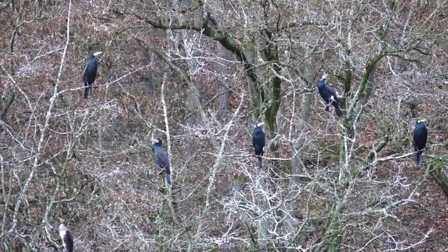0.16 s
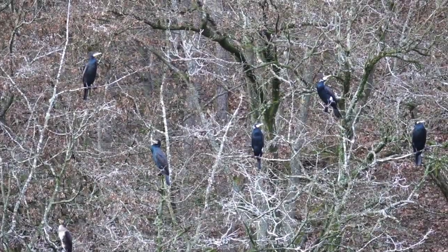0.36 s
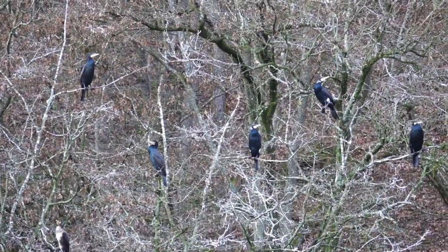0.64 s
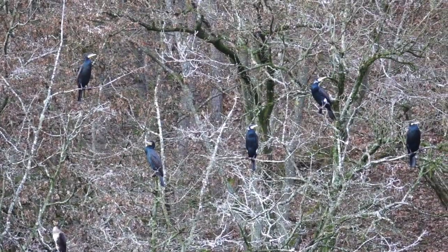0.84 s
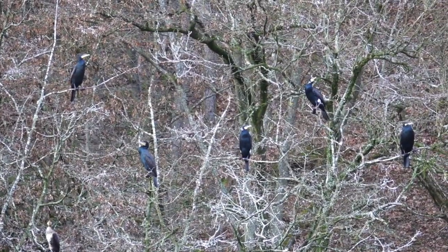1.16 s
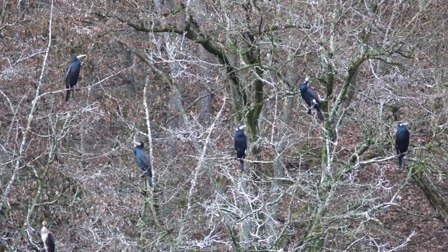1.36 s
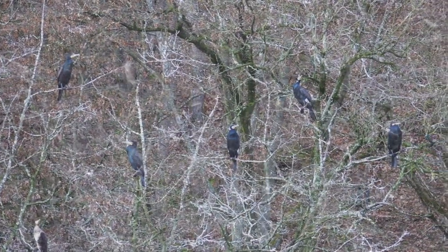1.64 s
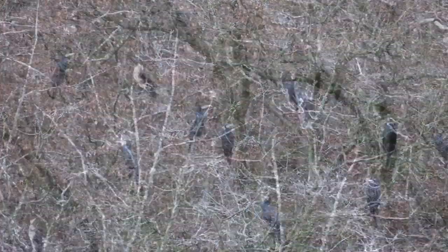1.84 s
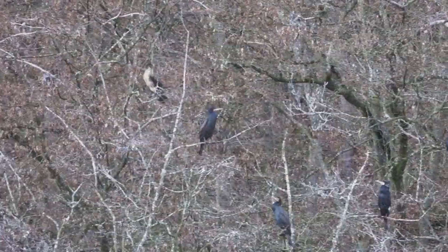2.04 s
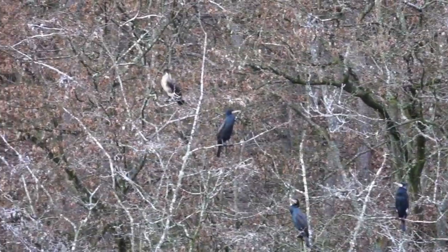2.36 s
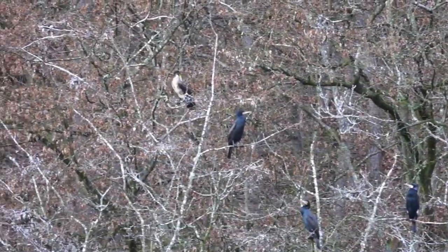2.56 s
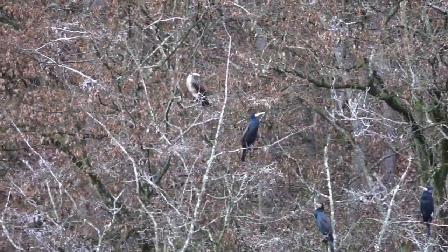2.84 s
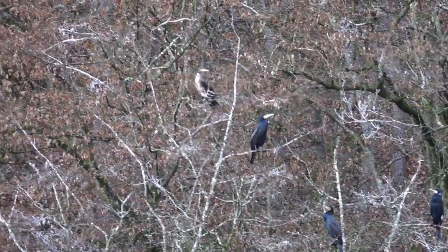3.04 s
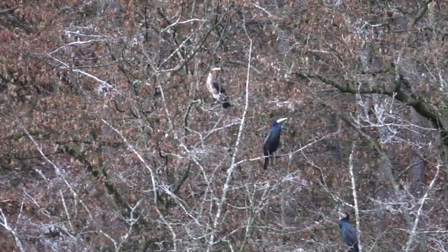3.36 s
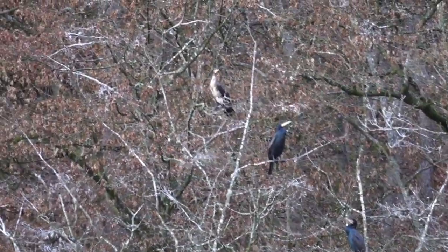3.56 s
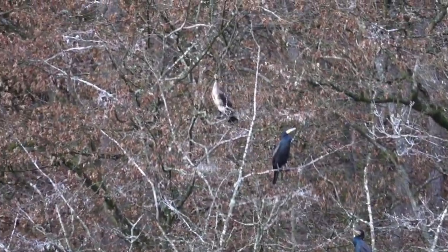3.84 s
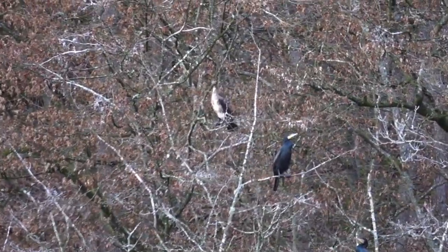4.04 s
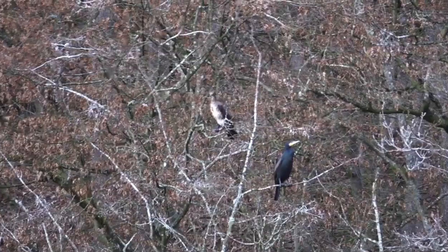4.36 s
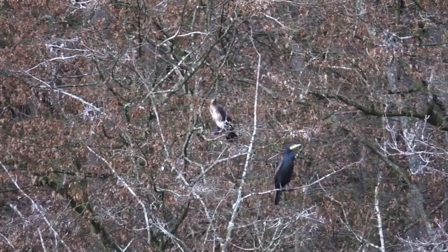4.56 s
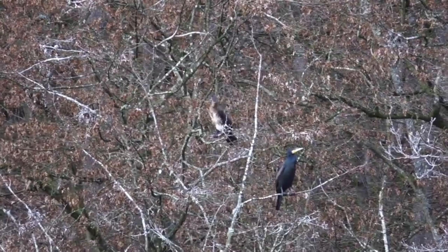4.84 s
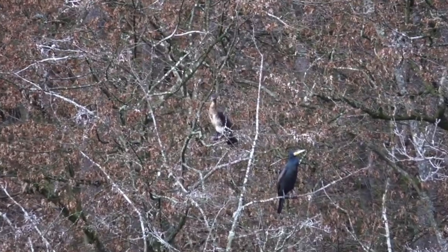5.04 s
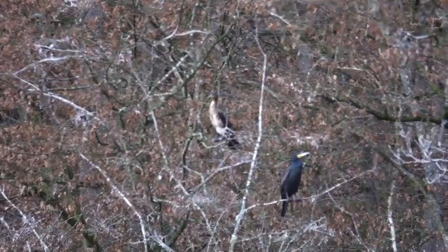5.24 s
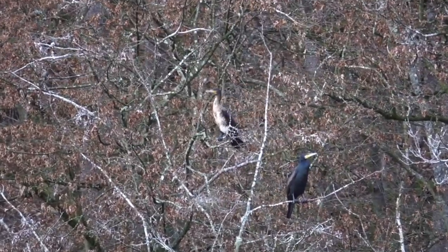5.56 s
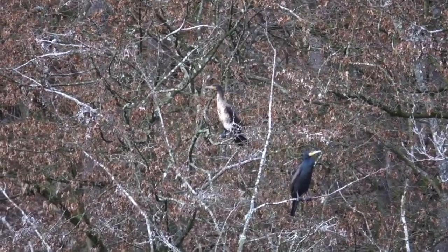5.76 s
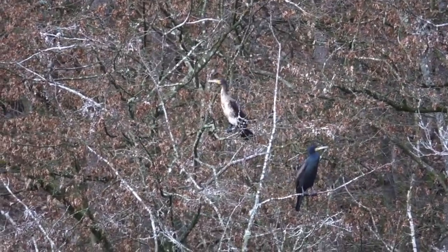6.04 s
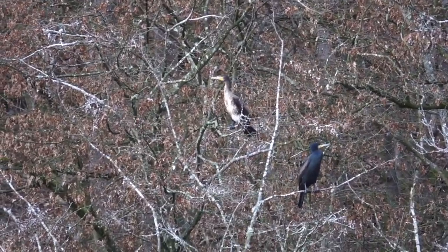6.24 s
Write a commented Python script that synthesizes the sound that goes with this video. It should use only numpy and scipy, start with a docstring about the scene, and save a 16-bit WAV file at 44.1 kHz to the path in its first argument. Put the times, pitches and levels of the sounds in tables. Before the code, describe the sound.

Large dark waterbirds quarrel on bare branches. First come faint, whispery wing flaps over still woodland air, then dry bill clacks, breathy hisses and a swell of rustling and distant twitter. Short, rough, nasal squawks come in rapid series, loudest in the middle, then give way to slow, throaty, rattling croaks. The microphone is outdoors, with low wind-like bumps, central birds and only a slight, thin woodland echo.

```python
"""Cormorant quarrel at a woodland roost

A bird flaps in among rustling twigs; a quarrel follows. Squawks break from a squeak into a rasp (slapping
membrane through throat resonances), with low croaks among them (slow pulses ringing a swollen throat).
Bills clack and hiss (ringing noise), wing gusts thump the microphone (short sine eddies),
far birds twitter (sliding tones), and the trees return a faint echo (decaying noise convolution)."""
import sys
import numpy as np
from scipy import signal
from scipy.fft import rfft, irfft
from scipy.io import wavfile
from scipy.ndimage import uniform_filter1d, map_coordinates

SR = 44100
rng = np.random.default_rng(int(sys.argv[2]) if len(sys.argv) > 2 else 0)


def unload_wav(signal):
    """Save mono or channel-first audio to the path in sys.argv[1] as 16-bit WAV at rate SR, clipped to [-1, 1]."""
    wavfile.write(
        sys.argv[1],
        SR,
        np.round(np.clip(np.atleast_2d(signal).T, -1, 1) * 32767).astype(np.int16),
    )


N = 282319
T = np.arange(N) / SR
FILTER_SIZE = 16384
FREQS = np.maximum(np.arange(FILTER_SIZE // 2 + 1) * SR / FILTER_SIZE, 1)  # Hz

# Squawks: (time [s], length [s], squeak pitch [Hz], break time constant [s], level [dB], growth over call [dB],
# mid-call arch [dB], roughness [factor], end drop [dB], rasp trail decay [s], highest overtone [Hz])
SQUAWKS = [(3.37, 0.029, 1038, 0.061, -36, -0.5, 1.5, 2.6, -4, 0.017, 8700),
           (3.538, 0.057, 1253, 0.022, -37.5, -4.5, -9, 0.79, -9.5, 0.018, 9100),
           (3.717, 0.019, 1870, 0.038, -43.5, 17.5, 1.5, 0, -6, 0.002, 8700),
           (4.135, 0.046, 1288, 0.021, -37, 9, 3.5, 1.17, -7.5, 0.027, 9300),
           (4.292, 0.081, 1178, 0.013, -33, 0, -3, 0.85, -15, 0.026, 12900),
           (4.504, 0.096, 1297, 0.017, -34, 6, 5, 1.04, 0.5, 0.021, 12900),
           (4.681, 0.074, 1730, 0.017, -33, 4.5, 1, 0.8, 1.5, 0.021, 13000),
           (4.873, 0.069, 1930, 0.016, -38, 14.5, 2, 0.88, -14, .007, 12900),
           (5.08, 0.056, 836, 0.0089, -33.5, 6, 4.5, 1, 0, 0.019, 13000),
           (5.261, 0.055, 776, 0.02, -47, 0, 0, 0.8, -10, 0.011, 5800),
           (5.323, 0.021, 1216, 0.056, -40.5, 2.5, -4, 0.07, -13, 0.0039, 4200),
           (5.987, 0.095, 753, 0.0064, -60, -4, -5, 1.28, -14, 0.0043, 4460)]
# Throat and bill resonances of the squawk, before per-call detuning: (frequency [Hz], width [Hz], level [dB])
THROAT = [(669, 160, -14.5), (1380, 320, -18), (1986, 220, -2), (2325, 80, 10), (2841, 113, 1.5),
          (3658, 153, 5.5), (4356, 236, -1.5), (4940, 300, -1.5), (5700, 290, -4), (6334, 110, -9),
          (7720, 320, -9.5), (8180, 290, -15.5), (9150, 240, -17.5), (11300, 600, -21.5),
          (11960, 240, -18.5)]
# Thin squeaks: (time [s], length [s], first pitch [Hz], last pitch [Hz], level [dB])
SQUEAKS = [(3.371, 0.0037, 2520, 2440, -38), (4.673, 0.027, 5090, 4750, -40),
           (4.878, .014, 5220, 4800, -46)]
# Clear fundamentals: (time [s], length before ring-out [s], mean pitch [Hz], level [dB])
HOOTS = [(4.606, 0.032, 632, -54.5), (4.712, 0.042, 689, -38), (5.146, 0.033, 692, -41)]
# Croaks: (time [s], length [s], slack pulse rate [Hz], lowest resonance [Hz], its glide over the call [Hz],
# level [dB], rise [s], pressed second resonance [dB], press centre [share of length],
# press width [share of length], third resonance re second [dB], pressed sag of lowest [Hz], unevenness [factor])
CROAKS = [(4.849, 0.11, 144, 440, 48, -40, 0.025, -5.5, 0.75, 0.23, -5.5, 9, 0.87),
          (5.205, 0.13, 139.2, 510, -47, -37.5, 0.04, -5.5, 0.73, 0.23, -6.5, 126, 2),
          (5.527, .12, 125.1, 468.4, -7.5, -32.5, 0.048, -13.5, 0.7, .24, -17, 49, 1.1),
          (5.827, 0.1153, 132.8, 465.4, 4.5, -33.5, 0.02, -6.5, .62, .4, -13, 5.6, 0.76),
          (6.131, 0.11, 137.4, 512, -14, -37, 0.011, -15.5, 0.74, .34, 0, 8.2, 0.96)]
# Swollen-throat resonances: (multiple of lowest [ratio], decay [s])
POUCH = [(0.999, 0.0013), (1.96, 0.001128), (2.9, 0.00093), (4.8, 0.00032)]
# Bill clacks: (time [s], relative level [dB], upper rings re lower [dB before scaling])
CLACKS = [(2.6095, -32, -19), (2.931, -41, -4.5), (6.094, -32, 2.5)]
# Lower bill rings: (frequency [Hz], width [Hz], level [dB])
BILL_LOW = [(1208, 95, 7), (1703, 155, -1), (2530, 400, -17)]
# Upper bill rings: (frequency [Hz], width [Hz], level [dB])
BILL_TOP = [(2780, 1520, -6), (3680, 170, 8), (4600, 1040, -11.5)]
# Wing strokes: (time [s], relative swish [dB], puff [dB], decay [s], relative crack [dB])
STROKES = [(0.222, -54, -73, 0.016, -57), (0.421, -57.5, -61.5, 0.021, -74),
           (0.627, -49.5, -58, 0.016, -44.5), (0.826, -44.5, -58, 0.022, -60),
           (1.019, -51.5, -59, 0.028, -39.5), (1.215, -48.5, -50.5, 0.0089, -46.5),
           (1.414, -53.5, -53, 0.012, -82), (1.614, -47, -57, 0.023, -66), (1.816, -61, -54, 0.0079, -48)]
# Feather swish spectrum: (frequency [Hz], relative level [dB])
FEATHER = [(400, -36), (900, 4), (1500, -14.5), (2400, 3), (3500, 13.5), (4500, -6.5), (6200, -20),
           (13000, -57)]
# Air puff spectrum: (frequency [Hz], relative level [dB])
PUFF = [(30, -46), (150, -3.5), (290, 11.5), (500, -2), (1000, -4.5), (2500, -33)]
# Wings brushing twigs: (time [s], relative rustle [dB], decay [s], relative tick [dB])
BRUSHES = [(3.192, -38.5, 0.027, -53), (5.31, -33.5, 0.025, -43.5)]
# Brushed twig spectrum: (frequency [Hz], relative level [dB])
TWIGS = [(900, -33.5), (2100, -4), (3900, 3), (5500, -9.5), (8500, -17.5), (12500, -28), (15000, -40)]
# Open-bill hisses: (time [s], length [s], first ring [Hz], last ring [Hz], level [dB])
HISSES = [(0.704, 0.078, 3300, 3620, -71.5), (0.92, 0.038, 3340, 3480, -66),
          (2.731, 0.083, 3500, 3130, -62.5), (2.738, 0.077, 2304, 2370, -61.5),
          (2.97, 0.037, 3300, 3580, -50.5), (2.996, 0.23, 3410, 3016, -61.5)]
# Rings of the long wash: (frequency [Hz], width [Hz], level [dB])
WASH = [(2850, 100, -6.5), (3620, 210, 0)]
# Gusts on the microphone: (time [s], length [s], nominal rocking rate [Hz], level [dB])
GUSTS = [(2.916, 0.041, 169.4, -48.5), (3.22, 0.022, 105, -42), (3.334, 0.047, 154.3, -37),
         (3.683, 0.013, 171, -43), (3.8, 0.0126, 150, -42), (5.321, 0.025, 146.7, -35.5),
         (5.352, 0.017, 72, -37)]
# Background stir: (time [s], churned air before AIR_OFFSET_DB [dB], twigs and twitter before TWIG_OFFSET_DB [dB])
STIR = [(0.0, -73, -77), (0.86, -86, -76.5), (1.21, -78, -79.5), (1.69, -80, -83.5), (2.64, -66, -71.5),
        (3.17, -54, -64.5), (3.53, -56, -62.5), (3.85, -57, -62.5), (4.47, -68.5, -71), (4.71, -61, -70),
        (5.11, -62.5, -79), (6.4, -71, -91.5)]
# Churned air spectrum: (frequency [Hz], relative level [dB])
AIR = [(15, -30), (25, -9.5), (151, 2), (243, 1.5), (450, -8), (630, -14.5), (730, -10.5), (909, -28),
       (2000, -26.5), (2600, -55.5), (4400, -120)]
# Rustling twig spectrum: (frequency [Hz], relative level [dB])
RUSTLE = [(820, -29), (1400, -11), (2090, -9), (2270, -3), (2550, -14), (2820, -6), (3640, -3.5),
          (4770, -15), (5500, -18.5), (8000, -34), (10400, -84)]
# Still air of the wood, spectrum: (frequency [Hz], relative level [dB])
WOOD = [(18, -39.5), (30, -21.5), (301, 2), (503, -8), (757, -5.5), (1230, -7.5), (1590, -20),
        (3430, -27.5), (6030, -22.5), (13700, -25.5)]

SQUEAK_ROUGH = .14  # share of the roughness present before the break
SQUAWK_ATTACK_S, SQUAWK_RELEASE_S = 0.0092, 0.0021
DOUBLING = 0.71  # strong-weak alternation of rough slaps
THROAT_SAG = 0.02  # time-warp factor that lowers the resonances through a call
RASP_HZ, RASP_SAG_HZ_PER_S, RASP_LOWEST_HZ = 815.3, 2200, 573  # pitch after the break
# a weak push rattles: mean rate, onset level, further drop to full rattle
RATTLE_HZ, RATTLE_BELOW_DB, RATTLE_FULL_DB = 111.9, -36, 8.5
CROAK_ONSET_DB, CROAK_FADE_DB_PER_S, CROAK_RELEASE_S = -13, -40.5, 0.0092
PRESS_RATE, PRESS_DIP_DB = .33, -4.5  # pressing: pulse speed-up share, dip of lowest resonance
WAKE_HZ, WAKE_DB, WAKE_STRETCH = 41.7, -5.5, 3.34  # nominal rate, maximum re eddy, length re eddy
AIR_OFFSET_DB, TWIG_OFFSET_DB, WOOD_DB = 3, -1.5, -72.5
TOP_HZ = 15200


def undb(db):
    """Decibels to gain."""
    return 10 ** (np.asarray(db) / 20)


def unit(x):
    """Scale to rms 1."""
    return x / np.sqrt(np.mean(x ** 2) + 1e-20)


def shape(x, gain):
    """Minimum-phase filter with the given gain at FREQS, via the folded cepstrum."""
    cepstrum = irfft(np.log(gain + 1e-6))
    cepstrum[1:FILTER_SIZE // 2] *= 2
    cepstrum[FILTER_SIZE // 2:] = 0
    response = irfft(np.exp(rfft(cepstrum)))[:4096]
    return signal.oaconvolve(x, response)[:len(x)]


def slope(points):
    """Gain through (Hz, dB) points, on a log-frequency axis."""
    hz, db = np.transpose(points)
    return undb(np.interp(np.log(FREQS), np.log(hz), db))


def rings(modes):
    """Gain of steep resonances (Hz, width Hz, dB), added in power."""
    power = sum((undb(db) / (1 + 2 * ((FREQS - hz) / width) ** 2)) ** 2 for hz, width, db in modes)
    return np.sqrt(power)


def noise(gain):
    """Coloured noise of rms 1."""
    return unit(shape(rng.standard_normal(N), gain))


def walk(rate_hz, size=N):
    """Smooth random curve through normal draws, rate_hz of them a second."""
    steps = np.arange(size) * rate_hz / SR
    return map_coordinates(rng.standard_normal(int(steps[-1]) + 3), [steps], order=2, mode="nearest")


def burst(start_s, rise_s, decay_s):
    """Envelope with a linear rise and an exponential decay."""
    age = np.maximum(T - start_s, 0)
    return np.minimum(age / rise_s, 1) * np.exp(-np.clip((age - rise_s) / decay_s, 0, 20))


def swell(start_s, length_s):
    """Half-sine envelope."""
    return np.sin(np.pi * np.clip((T - start_s) / length_s, 0, 1))


def call(start_s, length_s, tail_s):
    """Sample indices of a call and its tail, their age [s], and the share of the call gone by."""
    span = np.arange(int(start_s * SR), min(int((start_s + length_s + tail_s) * SR), N))
    age = (span - span[0]) / SR
    return span, age, np.minimum(age / length_s, 1)


def glide_phase(first_hz, last_hz, gone):
    """Phase of a linear pitch glide."""
    return 2 * np.pi * np.cumsum(first_hz + (last_hz - first_hz) * gone) / SR


def highpass(x, order, hz):
    """Zero-phase high-pass."""
    return signal.sosfiltfilt(signal.butter(order, hz, "high", fs=SR, output="sos"), x)


def sung(voice, loudness, size=500):
    """Level a sound to the given loudness, whichever resonance its harmonics cross."""
    power = np.maximum(uniform_filter1d(voice ** 2, size), 0)
    return voice * loudness / np.sqrt(power + 1e-4 * power.max())


def squawks(jitter=0.0868, shimmer_db=-0.5, shimmer_rate_hz=420, bright_power=2.0, gape_db=5, shut_db=-5):
    """A membrane slaps shut once a cycle; when rough, its periods scatter and air rasps through."""
    rasp, jitter_rate_hz, flex_s, flex_rate_hz = .3, 750, .00021, 55
    smear, detune, recolour_db, rattle_depth = .11, .008, .8, .8
    voice, loudness, sag_s, bill_db = np.zeros((4, N))
    k = np.arange(1, 24)[:, None]  # harmonic numbers
    for (start, length, squeak_hz, break_s, db, growth_db, arch_db,
         roughness, drop_db, trail_s, highest_hz) in SQUAWKS:
        span, age, gone = call(start, length, 2 * (trail_s + SQUAWK_RELEASE_S))
        size = len(span)
        # the squeak holds briefly, then breaks down into the rasp
        squeak = np.exp(-(age / break_s) ** 2)
        rasp_hz = np.maximum(RASP_HZ - RASP_SAG_HZ_PER_S * age, RASP_LOWEST_HZ)
        hz = squeak * squeak_hz + (1 - squeak) * rasp_hz
        smooth = squeak * (1 - SQUEAK_ROUGH) * (age < length)
        rough = np.minimum(roughness * (1 - smooth), 1.3)
        rough = rough * np.exp(.25 * walk(80, size) + .06)

        # some calls drop sharply to a weaker rasp, others fade gradually from full level
        after = np.maximum(age - length, 0)
        trail = undb(min(drop_db, 0)) * np.exp(-after / trail_s)
        gate = np.minimum(age / SQUAWK_ATTACK_S, 1) ** 2
        gate *= np.maximum(np.exp(-after / SQUAWK_RELEASE_S), trail)
        gate *= np.minimum((age[-1] - age) / (2 * SQUAWK_RELEASE_S), 1)
        push_db = db + growth_db * (gone - .5) + arch_db * (np.sin(np.pi * gone) - 2 / np.pi)

        hz = hz * np.exp(jitter * rough * walk(jitter_rate_hz, size))
        phase = 2 * np.pi * np.cumsum(hz) / SR
        harmonics = np.cos(k * phase + smear * k ** 2) * (k * hz < highest_hz)
        slaps = unit(harmonics.sum(axis=0) * (1 + DOUBLING * rough * np.cos(phase / 2)))
        air = rasp * rough * (1 + np.cos(phase)) * rng.standard_normal(size)
        source = gate * (slaps + air) * undb(shimmer_db * rough * walk(shimmer_rate_hz, size))

        # the throat is held a little differently for every call
        holds = rng.standard_normal((len(THROAT), 2))
        held = [(f * (1 + detune * a), width, ring_db + recolour_db * b)
                for (f, width, ring_db), (a, b) in zip(THROAT, holds)]
        voice[span] += shape(source, rings(held))

        below_db = RATTLE_BELOW_DB - push_db - 20 * np.log10(gate + 1e-6)
        weak = np.clip(below_db / RATTLE_FULL_DB, 0, 1) * (1 - squeak)
        rattle_hz = RATTLE_HZ * np.exp(.42 * walk(RATTLE_HZ, size))
        rattle = np.cos(2 * np.pi * np.cumsum(rattle_hz) / SR)
        loudness[span] += gate * undb(push_db) * (1 + rattle_depth * weak * rattle)
        # the bill opens through the call and shuts as it trails off
        bill_db[span] = gape_db * (np.sin(.7 * np.pi * gone) - .75) + shut_db * np.minimum(after / trail_s, 1)
        sag_s[span] += THROAT_SAG * length * gone * (1 - gone)

    top = highpass(voice, 6, 6800)
    # the soft throat bends the lower resonances; those of the stiff bill stay put
    bent = T + sag_s + flex_s * walk(flex_rate_hz)
    throat = map_coordinates(voice - top, [bent * SR], order=3)
    upper = highpass(throat, 4, 3200)
    # harder calls close more sharply and carry more top
    effort = (loudness / undb(-34.5)) ** bright_power
    return sung(throat - upper + undb(bill_db) * (upper + effort * top), loudness, size=350)


def squeaks():
    """The tight membrane gives a thin, falling squeak near the start of some squawks."""
    out = np.zeros(N)
    for start, length, first_hz, last_hz, db in SQUEAKS:
        span, _, gone = call(start, length, 0)
        tone = np.sin(glide_phase(first_hz, last_hz, gone))
        out[span] += np.sqrt(2) * undb(db) * np.sin(np.pi * gone) * tone
    return out


def hoots(ring_out=1.88):
    """The fundamental locks to the lowest throat resonance, wavers, sinks a little and rings out."""
    waver, sink, flicker_db = .055, .12, 3.5
    out, drift = np.zeros(N), 1 + waver * walk(260)
    for start, length, hz, db in HOOTS:
        span, _, gone = call(start, ring_out * length, 0)
        bend = drift[span] * (1 + sink * (.5 - gone))
        tone = np.sin(2 * np.pi * hz * np.cumsum(bend) / SR)
        out[span] += np.sqrt(2) * undb(db) * np.sin(np.pi * gone ** 0.5) ** 2 * tone
    return out * undb(flicker_db * walk(200))


def croaks(jitter=.035, pressed_jitter=0.051, shimmer_db=1.94, pressed_shimmer_db=1.0, waver=0.057,
           breathy_db=-27, slack_db=-20, top_db=-18, linger_db=-17, linger_s=0.011):
    """Slow pulses ring the swollen throat; pressing makes them faster, less even and richer in overtones."""
    out, ring_age = np.zeros(N), np.arange(int(.06 * SR)) / SR
    for (start, length, rate, throat_hz, glide_hz, level_db, rise_s, second_db,
         press_at, press_width, third_db, sag_hz, uneven) in CROAKS:
        age = 0
        for late, strong, *detune in rng.standard_normal((40, 6)):  # one row a pulse
            if age > length + 2 * CROAK_RELEASE_S:
                break
            gone = min(age / length, 1)
            press = np.exp(-((gone - press_at) / press_width) ** 2)
            db = level_db + CROAK_ONSET_DB * max(1 - age / rise_s, 0)
            db += CROAK_FADE_DB_PER_S * max(age - rise_s, 0)
            db += (shimmer_db + pressed_shimmer_db * press) * strong
            release = np.exp(-max(age - length + CROAK_RELEASE_S, 0) / CROAK_RELEASE_S)
            size = 2 * undb(db) * release

            upper_db = slack_db + (second_db - slack_db) * np.sqrt(press)
            gains = undb([PRESS_DIP_DB * press,
                          upper_db,
                          upper_db + third_db + slack_db * (1 - press) / 2,
                          upper_db + third_db / 2 + top_db])
            at = int((start + age) * SR)
            sags = (sag_hz * press, 0, 0, 0)
            for (multiple, decay), gain, off, sag in zip(POUCH, gains, detune, sags):
                hz = multiple * (throat_hz + glide_hz * gone - sag) * (1 + uneven * waver * off)
                envelope = (ring_age / (3 * decay)) ** 3 * np.exp(3 - ring_age / decay)  # peaks at 3 decays
                # the pouch rings on softly
                onset = np.sin(np.pi / 2 * np.minimum(ring_age / (10 * decay), 1)) ** 2
                envelope += undb(linger_db) * onset * np.exp(-ring_age / linger_s)
                ring = np.cos(2 * np.pi * hz * (ring_age - 3 * decay))
                out[at:at + len(ring_age)] += size * gain * envelope * ring
            period = np.clip(1 + uneven * (jitter + pressed_jitter * press) * late, .5, 2)
            age += period / (rate * (1 + PRESS_RATE * press))
    breath = noise(rings([(1070, 420, 13.0), (2900, 650, -23.5)]))
    return out + abs(out) * undb(breathy_db) * breath


def bills(rise_s=0.0013, decay_s=0.0032):
    """The mandibles snap together: levelled ringing noise in a short burst with a softer tail."""
    low = sung(noise(rings(BILL_LOW)), 0.82, size=200)
    high = sung(noise(rings(BILL_TOP)), 0.67, size=200)
    out = np.zeros(N)
    for start, db, top_db in CLACKS:
        envelope = burst(start, rise_s, decay_s) + undb(-18.5) * burst(start, 0.0076, 0.02)
        out += undb(db) * envelope * (low + undb(top_db) * high)
    return out


def hisses(change_rate_hz=420, flicker_db=2.5):
    """Air rings the open bill; the ring slides as the gape changes."""
    out = np.zeros(N)
    for start, length, first_hz, last_hz, db in HISSES:
        span, _, gone = call(start, length, 0)
        phase = glide_phase(first_hz, last_hz, gone)
        band = walk(change_rate_hz, len(span)) * np.cos(phase)
        band += walk(change_rate_hz, len(span)) * np.sin(phase)
        out[span] += undb(db) * np.sqrt(np.sin(np.pi * gone)) * band
    return out * undb(flicker_db * walk(180))


def wash(start_s=3.11, length_s=0.77, db=-60, flicker_db=2):
    """A long, faint ringing wash near 2.85 and 3.6 kHz lies under the first squawks."""
    return noise(rings(WASH)) * swell(start_s, length_s) ** .5 * undb(db + flicker_db * walk(24.9))


def wings(upstroke_s=0.0523, upstroke_db=-11, crackle_db=3, upstroke_puff_db=-11):
    """Downstrokes crack, puff and swish; upstrokes whisper and puff softly; brushed twigs tick and rustle."""
    swish, whisper, puff, crack, brush = np.zeros((5, N))
    tunes = rng.standard_normal(len(STROKES))
    for (start, swish_db, puff_db, decay, crack_db), tune in zip(STROKES, tunes):
        up = start + upstroke_s
        swish += undb(swish_db) * burst(start, 0.0078, decay)
        whisper += undb(swish_db + upstroke_db) * burst(up, 0.0082, 0.023)
        up_puff = undb(upstroke_puff_db) * burst(up, 0.017, 0.0052)
        puff += undb(puff_db) * (burst(start, 0.009, decay) + up_puff)
        snap = noise(rings([(3450 * np.exp(0.26 * tune), 450, 0), (2200, 1500, -10)]))
        crack += undb(crack_db) * burst(start, 0.0037, 0.0098) * snap
    for start, db, decay, tick_db in BRUSHES:
        brush += undb(db) * burst(start, 0.0064, decay)
        brush += undb(tick_db) * burst(start + 0.0012, .001, 0.0017)
    feathers = swish * noise(slope(FEATHER)) + whisper * noise(rings([(2890, 230, 0)]))
    feathers += brush * noise(slope(TWIGS))
    crackle = undb(crackle_db * walk(500) - 8.0)
    return feathers * crackle + crack * undb(-12.5) + puff * noise(slope(PUFF))


def gusts(lumpy_db=0.5, full_wake_s=0.027):
    """Each eddy from the wings rocks the microphone briefly; longer ones leave a stronger slow wake."""
    unsteady = np.exp(.3 * walk(170))
    out = np.zeros(N)
    for start, length, hz, db in GUSTS:
        turns = 2 * np.pi * np.cumsum(unsteady * (T > start)) / SR
        eddy = swell(start, length) ** 0.18 * np.sin(hz * turns)
        wake = swell(start, WAKE_STRETCH * length) * np.sin(WAKE_HZ * turns)
        wake *= undb(WAKE_DB) * min(length / full_wake_s, 1) ** 2
        out += np.sqrt(2) * undb(db) * (eddy + wake)
    return out * undb(lumpy_db * walk(140))


def stir():
    """Gains of churned air and of twigs, which grow as the bird comes in and die down as it settles."""
    s, air_db, twig_db = np.transpose(STIR)
    return undb(AIR_OFFSET_DB + np.interp(T, s, air_db)), undb(TWIG_OFFSET_DB + np.interp(T, s, twig_db))


def far_chirps(db=1, hz=3450, spread=0.2, glide=0.099):
    """Birds further off twitter in short, rough, sliding notes, more loudly as the roost is stirred up."""
    warble, length_s, count = .045, .07, 90
    out, age = np.zeros(N), np.linspace(0, 1, int(length_s * SR))  # age as a share of the note
    for slot, (delay, pitch, bend) in enumerate(rng.standard_normal((count, 3))):
        start = int((slot + abs(delay)) * N / count) % (N - len(age))
        rough = warble * walk(700, len(age))
        track_hz = hz * np.exp(spread * np.tanh(pitch) + glide * bend * age + rough)
        tone = np.sin(2 * np.pi * np.cumsum(track_hz) / SR)
        out[start:start + len(age)] += np.sin(np.pi * age) * tone
    return out * undb(db) * stir()[1]


def wander(x):
    """Random time warp: the bands of a sound drift up and down together."""
    share, rate_hz = .04, 14
    return map_coordinates(x, [np.cumsum(1 + share * walk(rate_hz))], order=3, mode="mirror")


def roost(twig_flicker_db=3, twig_grain_db=2):
    """Churned air and rustling twigs over the still wood; a far call dies away at first."""
    air_gain, twig_gain = stir()
    air = noise(slope(AIR)) * air_gain * undb(2.4 * walk(28))
    flicker = undb(twig_flicker_db * walk(33) + twig_grain_db * walk(400))
    twigs = wander(noise(slope(RUSTLE))) * twig_gain * flicker
    far_call = noise(rings([(920, 180, 3.0), (1660, 1200, -15.5)]))
    far_call *= undb(-58.5) * burst(0, 0.00056, 0.093)
    return air + twigs + far_call + noise(slope(WOOD)) * undb(WOOD_DB)


def trees(x, near_db=-17, near_s=0.022, far_db=-26, far_s=0.51, thin_hz=1300, far_dull_hz=4300):
    """Nearby trunks scatter a short echo; the twigs behind add a faint, thin tail."""
    t = T[:2 * SR]
    near, far = (unit(rng.standard_normal(len(t)) * np.exp(-t / decay) * (t > .006)) / np.sqrt(len(t))
                 for decay in (near_s, far_s))
    far = signal.sosfilt(signal.butter(1, thin_hz, "high", fs=SR, output="sos"), far)
    far = signal.sosfilt(signal.butter(3, far_dull_hz, fs=SR, output="sos"), far)
    echo = undb(near_db) * near + undb(far_db) * far
    return signal.fftconvolve(x, echo)[:N]


def scene(side_db=-22):
    """All direct sound is central; only an echo and a faint hiss have width."""
    near = squawks() + squeaks() + hoots() + croaks() + bills()
    near += hisses() + wash() + wings()
    echoed = near + far_chirps()
    mid = echoed + trees(echoed) + gusts() + roost()
    side = undb(side_db) * trees(echoed) + undb(-89.5) * rng.standard_normal(N)
    return np.array([mid + side, mid - side])


def record(dry):
    """A steep elliptic low-pass cuts the top."""
    return signal.sosfilt(signal.ellip(8, .2, 70, TOP_HZ, fs=SR, output="sos"), dry)


dry = scene()
out = record(dry)
unload_wav(out)
```